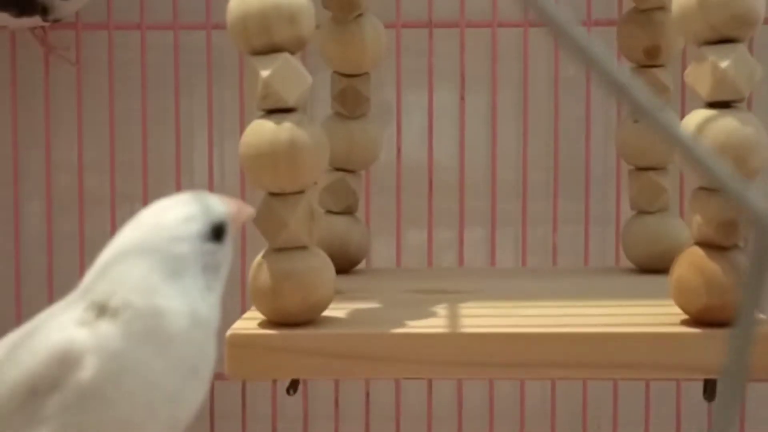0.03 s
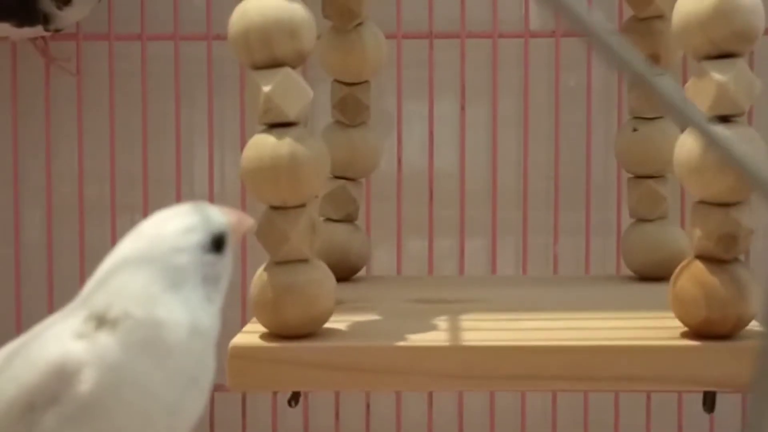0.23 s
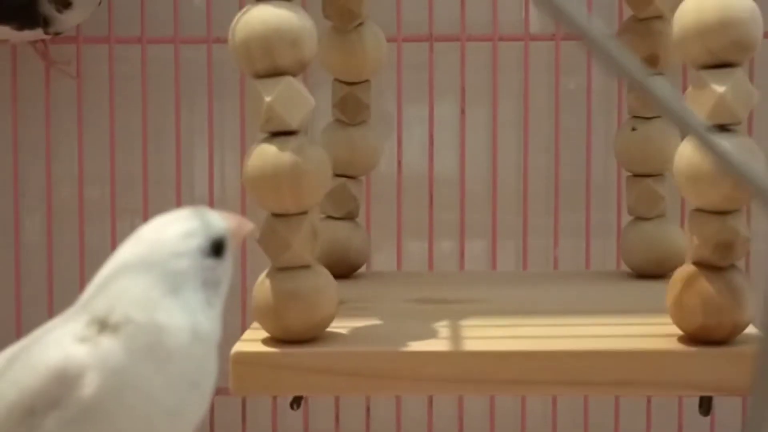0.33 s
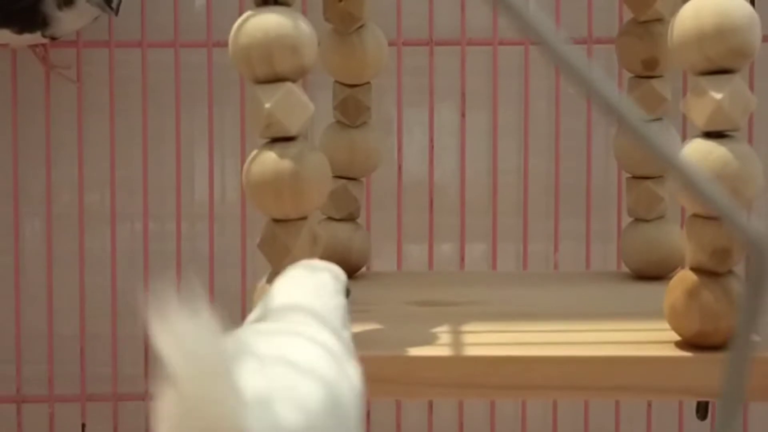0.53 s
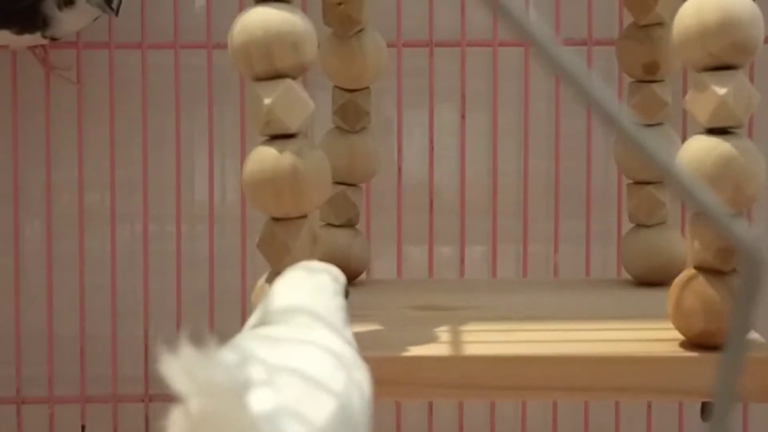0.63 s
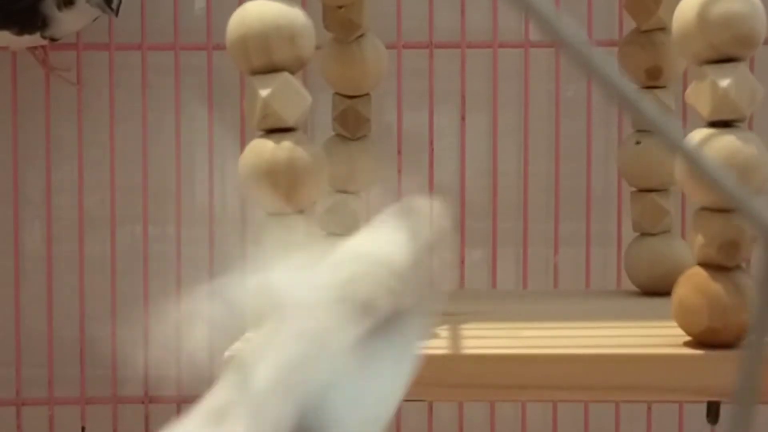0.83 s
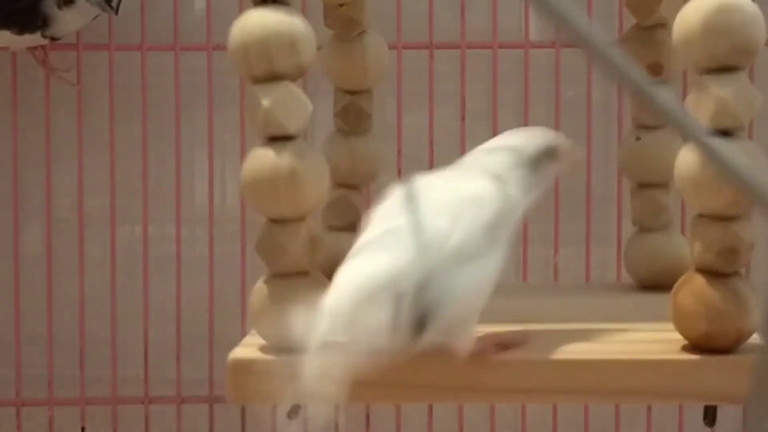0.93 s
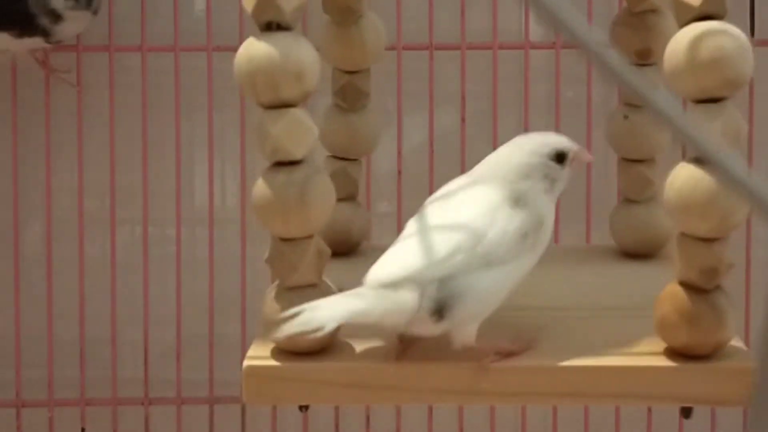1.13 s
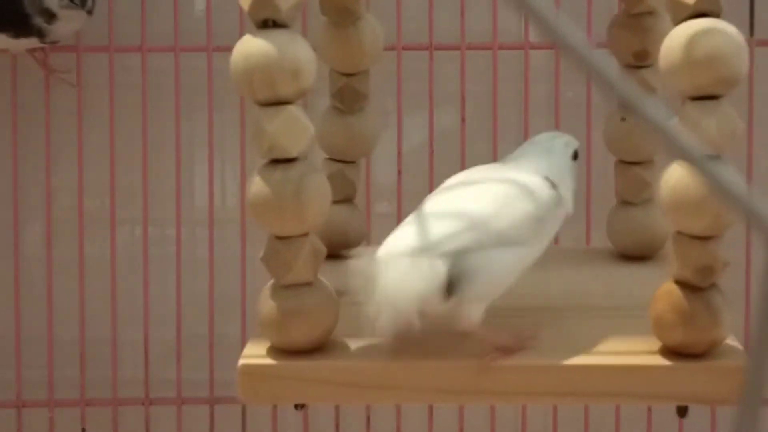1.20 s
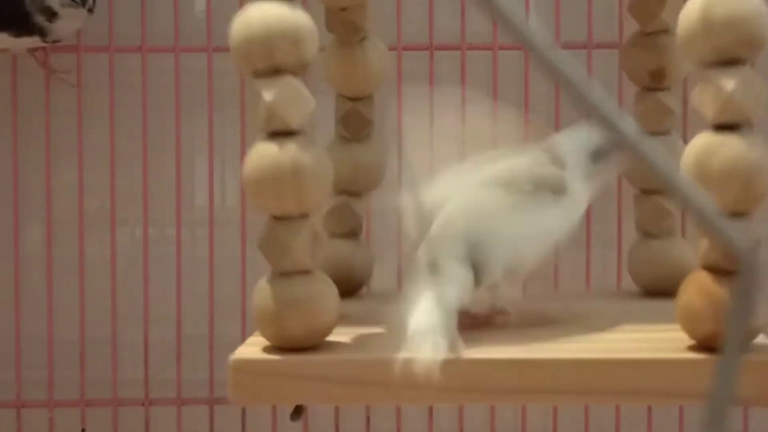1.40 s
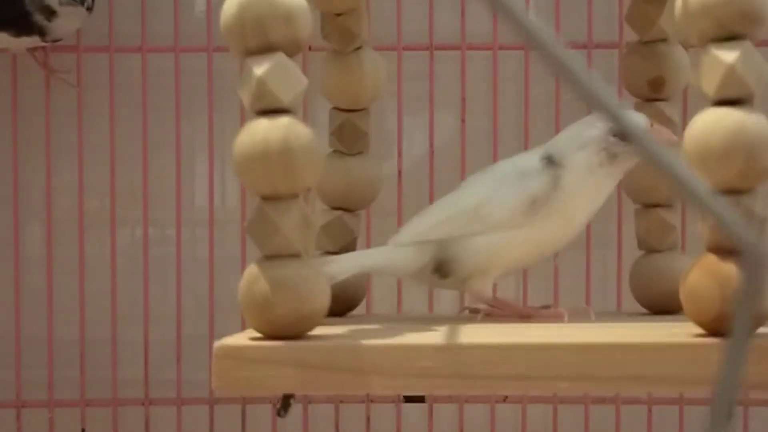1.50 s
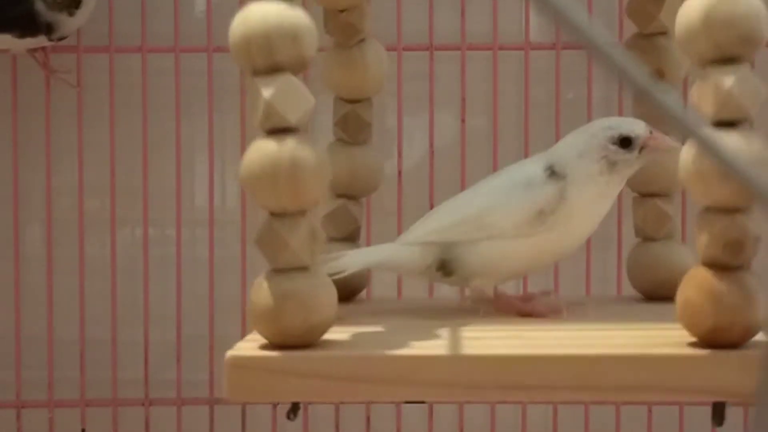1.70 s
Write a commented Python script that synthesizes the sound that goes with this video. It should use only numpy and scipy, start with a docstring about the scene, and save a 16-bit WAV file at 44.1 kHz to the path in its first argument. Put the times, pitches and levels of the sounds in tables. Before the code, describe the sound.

In a quiet room, a finch close to the microphone chirps once, sharply. A faint flutter and three quick, softer chirps follow, then its claws tap and scratch on a beaded wooden swing as the cage shudders slightly.

```python
"""In a quiet room, a small finch sits in a wire cage, close by and a little to the right.
It gives one sharp chip (a quick rising tone), hops onto a wooden swing with a flick of feathers,
chips three times, makes a soft nasal note and hops again. Its feet make the swing ring, claws and
wooden beads scrape in tiny clicks, and the cage shudders. Another bird whistles faintly over a
mains hum."""
import sys
import numpy as np
from scipy import signal
from scipy.fft import rfft, irfft
from scipy.io import wavfile

SR = 44100
rng = np.random.default_rng(int(sys.argv[2]) if len(sys.argv) > 2 else 0)


def generate_wav(signal):
    """Clip the signal to [-1, 1] and save it as 16-bit WAV at the path in sys.argv[1]."""
    frames = np.transpose(np.atleast_2d(signal))
    scaled = np.clip(frames, -1, 1) * 32767
    pcm = np.round(scaled).astype(np.int16)
    wavfile.write(sys.argv[1], SR, pcm)


N = 77175

# Pan is left minus right, so below 0 is to the right. A fade is the time to fall to about a third.
# The finch's chips: t/s, length/s, loudest point/share of length, start f/Hz, end f/Hz, level/dB,
# rasp/0-1, rasp rate/Hz, pan/dB
CHIPS = [(0.244, 0.018, 0.62, 3840, 5032, -7, 0.26, 700, -8.5),
         (1.0913, .0140, 0.46, 3575, 4624, -23, 0.77, 950, -8.5),
         (1.1361, 0.013, 0.55, 3766, 4372, -17, 0.36, 1089, -10.5),
         (1.18, .0160, 0.31, 3753, 3870, -23.5, 0.73, 1333, -6)]
# Tone colour (how strong each pitch is) of the breath in a chip: f/Hz, level/dB
BREATH_COLOUR = [(100, -33), (620, -19.5), (950, -12.5), (1300, -18.5), (2000, -14.5), (3200, -3),
                 (5200, -1), (7200, -9.5), (10500, -29.5), (15000, -23)]
# How the finch's throat shapes its soft note: f/Hz, level/dB
THROAT_COLOUR = [(400, -28), (850, 1), (1300, -8.5), (1800, -11), (3000, -2.5), (4400, 1.5), (5200, 6),
                 (7000, -9), (15000, -23)]
# Feet landing on the swing: t/s, level/dB, centre of the push f/Hz, rise/s
FOOTFALLS = [(0.741, -60, 1480, 0.0069), (0.761, -49, 1370, 0.0028), (0.775, -50, 1540, 0.002),
             (1.45, -44, 617, 0.0029), (1.47, -47.5, 900, 0.0028), (1.484, -45.5, 920, 0.0082),
             (1.507, -49.5, 710, 0.0041), (1.535, -57, 2220, 0.0025), (1.56, -61, 2620, .003),
             (1.629, -66, 900, 0.0055)]
# Notes at which the swing rings: f/Hz, level/dB, time to die away by 60 dB/s
SWING_NOTES = [(470, -2, 0.074), (587, 1.5, 0.046), (652.3, -6.5, 0.23), (737, -2, 0.037),
               (925, -11, 0.071), (1394, -4, 0.042), (1528, -1.5, .06), (1710, -14, 0.16),
               (1850, -9.5, 0.12), (2080, -12.5, 0.1), (3660, -18, .15), (5044, -13, 0.16),
               (5550, -17, 0.13)]
# Claws and beads scraping on wood: t/s, level/dB, fade/s, pan/dB
SCRAPES = [(1.45, -48.5, 0.041, -2), (1.463, -40.5, 0.024, -5), (1.477, -42, 0.014, 4),
           (1.5, -40.5, 0.0064, -5), (1.527, -48.5, 0.036, -11.5), (1.553, -45, 0.0085, 3),
           (1.577, -49.5, .016, 3), (1.601, -52, 0.015, 1), (1.623, -46.5, 0.016, -3.5),
           (1.652, -56.5, 0.066, -2), (1.684, -50, 0.0067, -4.5), (1.722, -48.5, 0.0042, -6)]
# Tone colour of the scraped wood: f/Hz, level/dB
SCRAPE_COLOUR = [(120, -5), (200, -5.5), (232, -1.5), (328, -12.5), (360, -3), (538, -7), (683, -2.5),
                 (836, -9), (2170, -7), (3020, -10), (5230, -2.5), (6880, -15), (16000, -23.5)]
# The cage shuddering as the bird moves: t/s, level/dB, fade/s
SHUDDERS = [(0.253, -49, 0.04), (0.667, -56.5, 0.026), (1.107, -48.5, 0.082), (1.457, -42.5, 0.058)]
# Tone colour of the shudders: f/Hz, level/dB
SHUDDER_COLOUR = [(20, -12.5), (50, -7.5), (92, 3.5), (120, -15.5), (150, -11.5), (200, -20.5),
                  (240, -20.5), (330, -26.5), (1000, -40.5)]
# Feathers flicking: t/s, level/dB, fade/s
FLICKS = [(.661, -63.5, 0.014), (0.678, -57.5, 0.027), (0.703, -69, .02), (0.727, -61.5, 0.022),
          (.738, -62, 0.03), (0.759, -55, 0.0073), (.777, -73, 0.0045)]
# Tone colour of the flicks: f/Hz, level/dB
FLICK_COLOUR = [(300, -4.5), (1500, -2), (3000, -1.5), (5200, 5), (7500, -1), (10500, -4.5), (15000, -0.5)]
# Rise and fall of a soft, high hiss: t/s, level/dB
HISS_SWELL = [(.81, -78), (.845, -61.5), (.875, -53), (.945, -55), (1.0, -61), (1.08, -64.5), (1.15, -73)]
# Tone colour of that hiss: f/Hz, level/dB
HISS_COLOUR = [(880, -31), (1500, -21.5), (2280, -20.5), (2700, -14.5), (3170, -17), (3450, -10.5),
               (4480, -7.5), (5300, 2.5), (8770, -30), (14000, -33)]
# Rise and fall of the far bird's whistle: t/s, level/dB
WHISTLE_SWELL = [(0, -68.5), (.03, -62.5), (.06, -65.5), (.09, -66.5), (.145, -64.5), (.175, -70.5),
                 (.225, -73.5), (.26, -81)]
# Tones of the mains hum: f/Hz, level/dB
HUM_TONES = [(100, -62.5), (149.5, -78), (199, -81)]
# Tone colour of the room's still air: f/Hz, level/dB
AIR_COLOUR = [(12, -37.5), (20, -2.5), (49, -11), (104, -11.5), (255, -24.5), (499, -21.5), (1480, -35.5),
              (3630, -36), (4810, -31.5), (8890, -41), (12400, -39.5), (13500, -43), (16000, -44.5)]
# Echoes from nearby walls: delay/s, left level/dB, right level/dB
WALL_ECHOES = [(.0105, -24.5, -21), (0.017, -28, -28), (.0255, -30.5, -33.5), (.036, -29.5, -25.5)]
# Tone colour of the cage's and the room's echoes: f/Hz, level/dB
ECHO_COLOUR = [(100, -12), (700, 2), (2500, -5.5), (4800, -6.5), (6500, -7.5), (10000, -10), (16000, -13.5)]

TOP_HZ = 15950  # upper edge of the sound


def chips():
    """Each chip is a tone sliding upward; a fast, uneven rasp adds side tones and a puff of breath."""
    t, out = clock(), 0
    glide_middle, glide_width = .39, .17  # shares of the chip's length
    for start, length, crest, start_hz, end_hz, db, rasp, rasp_hz, pan_db in CHIPS:
        progress = np.clip((t - start) / length, 0, 1)
        skew = np.log(.5) / np.log(np.clip(crest, .2, .8))  # puts the loudest point at the crest
        loudness = arch(progress ** skew) ** 1.14
        glide = (1 + np.tanh((progress - glide_middle) / glide_width)) / 2
        phase = wavering_phase(start_hz + (end_hz - start_hz) * glide, depth=.022, rate_hz=400)
        beat = wavering_phase(rasp_hz, depth=.09, rate_hz=400)
        below = undb(-11) * np.sin(phase - beat)
        above = undb(-3) * np.sin(phase + beat) + undb(-16) * np.sin(phase + 2 * beat)
        tone = np.sin(phase) + rasp * (below + above) + undb(-44) * np.sin(2 * phase)
        tone *= undb(1.1 * wander(560))  # a slight flutter
        puff = arch((t - start + .0023) / (length + .006)) * (1 + rasp * np.cos(beat))
        breath = undb(-8.5) * rasp * puff * stereo_noise(BREATH_COLOUR, likeness=.1)
        out += undb(db) * (pan(pan_db) * loudness * tone + pan(pan_db / 2) * breath)
    return out


def soft_call():
    """A quiet nasal note: a wavering buzz and some breath, both shaped by the finch's throat."""
    start_s, length_s, pitch_hz = 1.403, .034, 428
    phase = wavering_phase(pitch_hz, depth=.02, rate_hz=230)
    buzz = sum(np.cos(k * phase) for k in np.arange(1, TOP_HZ // pitch_hz))
    breath = undb(-3) * stereo_noise(THROAT_COLOUR, likeness=.25)
    loudness = np.sqrt(arch((clock() - start_s) / length_s))
    return undb(-53.5) * pan(-8) * loudness * (colour(buzz, THROAT_COLOUR) + breath)


def swing_knocks():
    """Each footfall makes the board and beads ring; a softer push favours the low notes."""
    out, push_width_octaves = np.zeros((2, N)), .84
    for start, db, push_hz, rise in FOOTFALLS:
        for hz, note_db, ring_s in SWING_NOTES:
            weight = np.exp(-.5 * (np.log2(hz / push_hz) / push_width_octaves) ** 2)
            detuned_hz = hz * (1 + .012 * rng.standard_normal())
            phase = 2 * np.pi * (detuned_hz * clock() + rng.random())
            tone = np.sin(phase + .89 * rng.standard_normal((2, 1)))  # left and right out of step
            out += undb(db + note_db) * weight * burst(start, rise, ring_s / np.log(1000)) * tone
    return out


def scrapes():
    """Claws and beads catch and slip on the wood in bursts of tiny clicks."""
    clicks_per_s, spread_db = 5600, 1.5
    size = undb(spread_db * np.minimum(rng.exponential(size=(3, N)), 4))
    clicks = rng.standard_normal((3, N)) * size * (rng.random((3, N)) < clicks_per_s / SR)
    pressure = sum(undb(db) * pan(side) * burst(start, .005, fade) for start, db, fade, side in SCRAPES)
    return pressure * colour(clicks[:2] + .44 * clicks[2], SCRAPE_COLOUR)  # both sides share row 2


def cage_thumps():
    """The cage shudders as the bird moves, and the hanging board thuds under the last landing."""
    shaking = sum(undb(db) * burst(start, .015, fade) for start, db, fade in SHUDDERS)
    shudder = shaking * stereo_noise(SHUDDER_COLOUR, likeness=.75)
    landing_s, board_hz = 1.462, 146.8
    thud = burst(landing_s, .0058, .031) * np.sin(2 * np.pi * board_hz * (clock() - landing_s))
    return shudder + undb(-44) * thud


def feathers():
    """Feathers flick brightly during the first hop; a soft hiss follows."""
    flicks = sum(undb(db) * burst(start, .0038, fade) for start, db, fade in FLICKS)
    rustle = flicks * stereo_noise(FLICK_COLOUR, likeness=.13) * undb(2.1 * wander(300))
    hiss = swell(HISS_SWELL) * stereo_noise(HISS_COLOUR, likeness=.17) * (clock() > HISS_SWELL[0][0])
    return pan(-.89) * rustle + pan(-5.5) * hiss


def far_whistle():
    """Another bird's thin whistle, blurred by the room, with a haze below it and an octave above."""
    def blurred_tone(hz, blur_hz):
        phase = 2 * np.pi * hz * clock()
        return unit(wander(blur_hz) * np.sin(phase) + wander(blur_hz) * np.cos(phase))
    pitch_hz = 2834
    whistle = blurred_tone(pitch_hz, 95)
    haze = undb(-8.5) * blurred_tone(2600, 450)
    octave = undb(-15.5) * blurred_tone(2 * pitch_hz, 480)
    return pan(-13) * swell(WHISTLE_SWELL) * (whistle + haze + octave)


def hum_and_air():
    """The mains hums with a slight waver over the faint noise of the room's still air."""
    hum = 0
    for hz, db in HUM_TONES:
        hum += undb(db + wander(5.3)) * np.sqrt(2) * np.sin(2 * np.pi * (hz * clock() + rng.random()))
    return hum + undb(-66.5) * stereo_noise(AIR_COLOUR, likeness=.29)


def room(sound):
    """Walls bounce the sound back; cage echoes stay on its side, while the room's come from all round."""
    def echoes(source, db, ring_s):
        tail = stereo_noise(ECHO_COLOUR, likeness=.067) * burst(.00086, .00067, ring_s / np.log(1000))
        tail /= np.sqrt(np.sum(tail ** 2, axis=1, keepdims=True))
        return undb(db) * signal.fftconvolve(source, tail, axes=1)[:, :N]
    mono = sound.mean(axis=0)
    walls = sum(undb([[left], [right]]) * np.pad(mono, (int(delay * SR), 0))[:N]
                for delay, left, right in WALL_ECHOES)
    cage = echoes(sound, db=-15, ring_s=.1)
    return sound + walls + cage + echoes(mono[None], db=-18, ring_s=.27)


def from_right(sound, lag_s=.00022):
    """A sound from the right reaches the left side a moment later."""
    delay = np.exp(-2j * np.pi * np.fft.rfftfreq(N, 1 / SR) * lag_s)
    return np.array([irfft(rfft(sound[0]) * delay, N), sound[1]])


def undb(db):
    """Turn decibels into a number to multiply by."""
    return 10 ** (np.asarray(db) / 20)


def unit(x):
    """Scale a signal to an average strength (rms) of 1."""
    return x / (np.sqrt(np.mean(x ** 2)) + 1e-12)


def clock():
    """The time of every sample, in seconds."""
    return np.arange(N) / SR


def colour(sound, curve):
    """Shape a sound with a curve of f/Hz, level/dB; the result has strength 1."""
    hz, db = np.array(curve, float).T
    gain = undb(np.interp(np.log(np.fft.rfftfreq(N, 1 / SR) + 1e-6), np.log(hz), db))
    return unit(irfft(rfft(sound) * gain, N))


def stereo_noise(curve, likeness):
    """Shaped noise; likeness (0-1) is how much of it left and right share."""
    noise = rng.standard_normal((3, N))
    return colour(np.sqrt(likeness) * noise[2] + np.sqrt(1 - likeness) * noise[:2], curve)


def wander(rate_hz):
    """Random wavering of strength 1, up to about the given rate."""
    smoothing = np.exp(-.5 * (np.fft.rfftfreq(N, 1 / SR) / rate_hz) ** 2)
    return unit(irfft(rfft(rng.standard_normal(N)) * smoothing, N))


def wavering_phase(hz, depth, rate_hz):
    """The running angle of a tone whose pitch wavers at random."""
    return 2 * np.pi * np.cumsum(hz * (1 + depth * wander(rate_hz))) / SR


def pan(db):
    """Left and right gains that make the left side db louder."""
    return undb(np.array([[db], [-db]]) / 2)


def arch(progress):
    """A rounded rise and fall as progress goes from 0 to 1."""
    return np.abs(np.sin(np.pi * np.clip(progress, 0, 1)))


def burst(start, rise, fade):
    """A straight rise, then a smooth dying away; times in seconds."""
    age = clock() - start
    return np.clip(age / rise, 0, 1) * np.exp(-np.maximum(age - rise, 0) / fade)


def swell(points):
    """Loudness that follows points of t/s, level/dB and stops at the last one."""
    times, db = np.array(points, float).T
    return undb(np.interp(clock(), times, db)) * (clock() < times[-1])


def scene():
    """The finch and its swing echo in the room, joined by the far bird, the thumps and the hum."""
    finch = from_right(chips() + soft_call()) + feathers() + scrapes() + swing_knocks()
    return room(finch) + far_whistle() + cage_thumps() + hum_and_air()


def record(dry):
    """Flatten any peak above the ceiling, then cut the highest treble."""
    ceiling = .8
    treble_cut = signal.ellip(10, .2, 90, TOP_HZ, fs=SR, output="sos")
    return signal.sosfilt(treble_cut, np.clip(dry, -ceiling, ceiling))


dry = scene()
out = record(dry)
generate_wav(out)
```